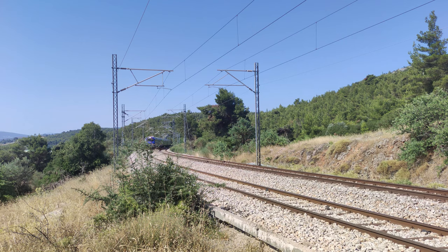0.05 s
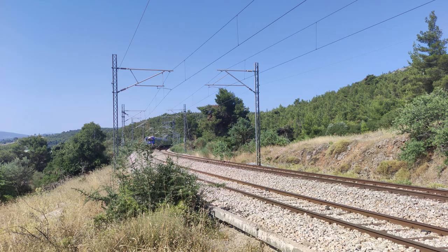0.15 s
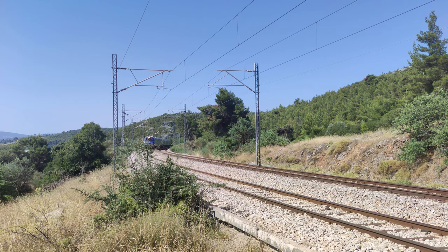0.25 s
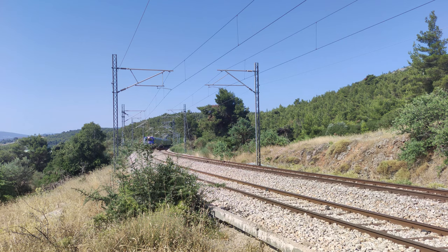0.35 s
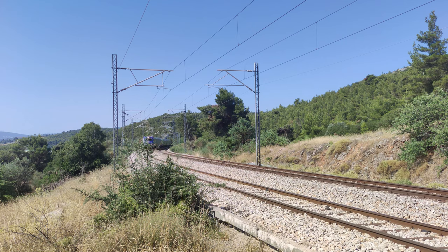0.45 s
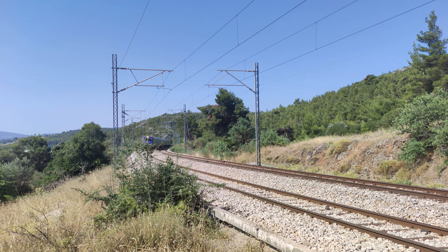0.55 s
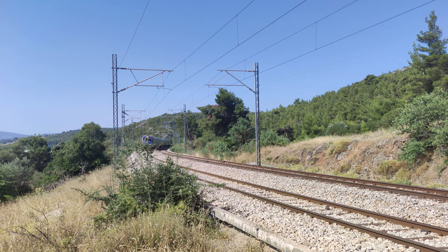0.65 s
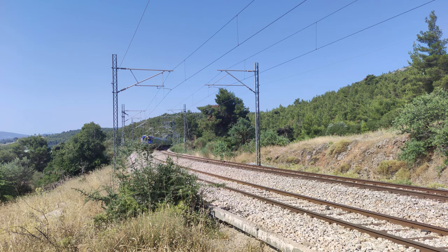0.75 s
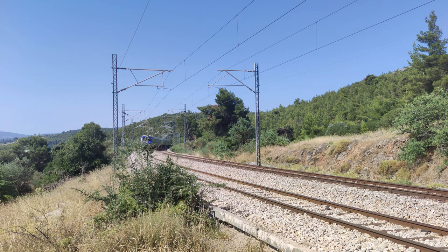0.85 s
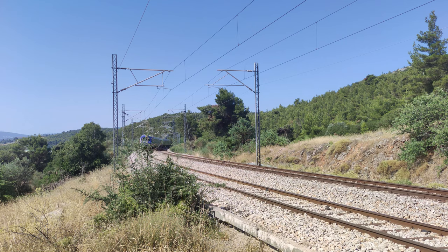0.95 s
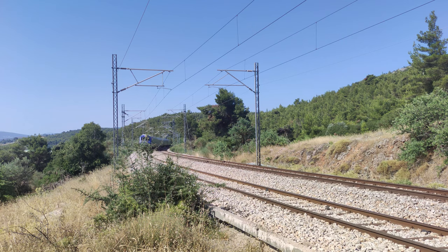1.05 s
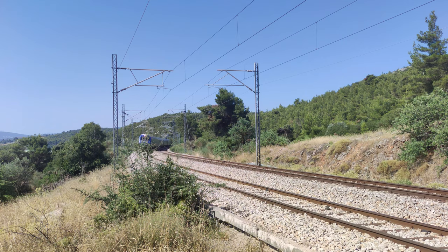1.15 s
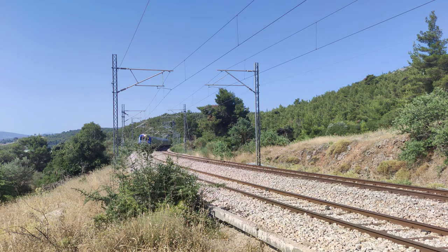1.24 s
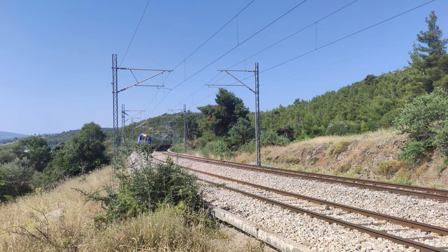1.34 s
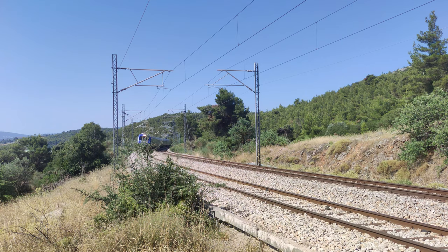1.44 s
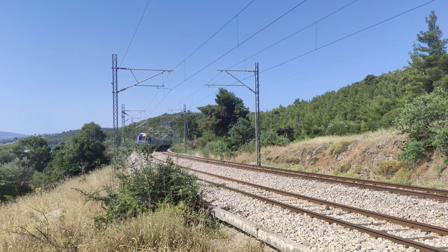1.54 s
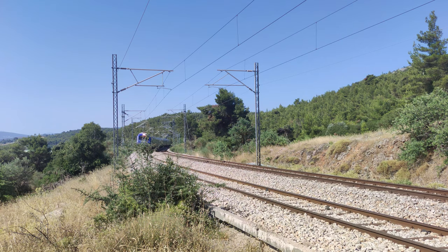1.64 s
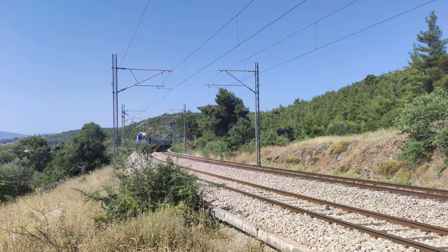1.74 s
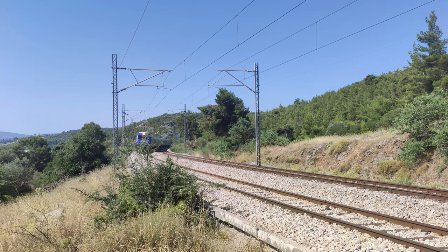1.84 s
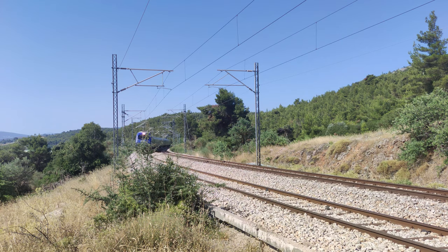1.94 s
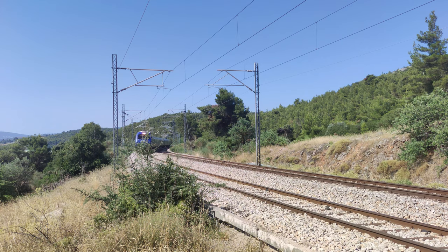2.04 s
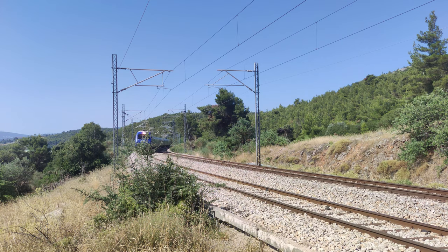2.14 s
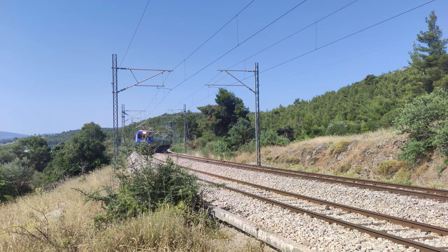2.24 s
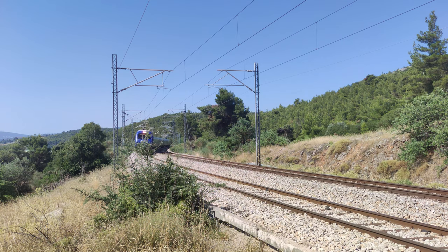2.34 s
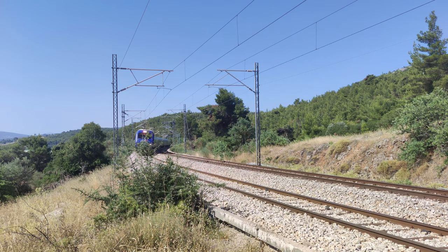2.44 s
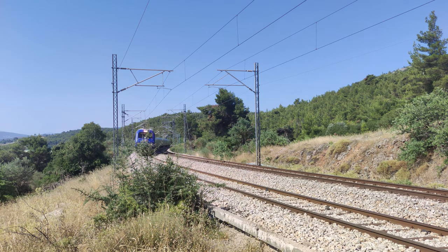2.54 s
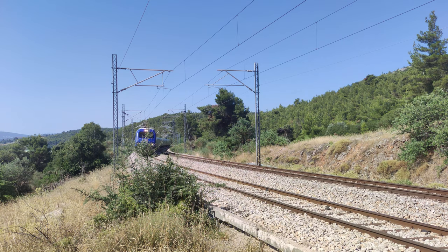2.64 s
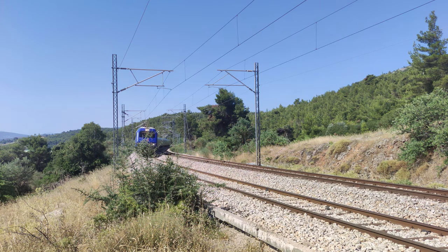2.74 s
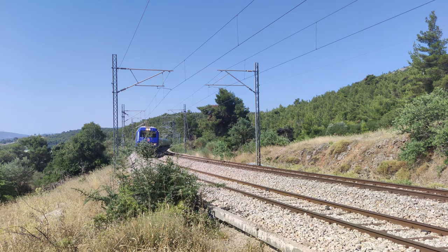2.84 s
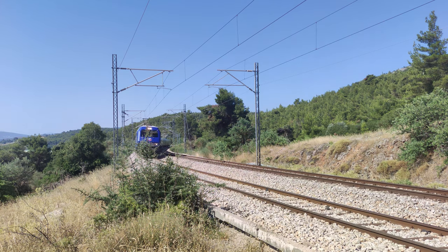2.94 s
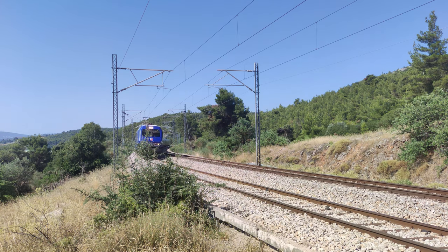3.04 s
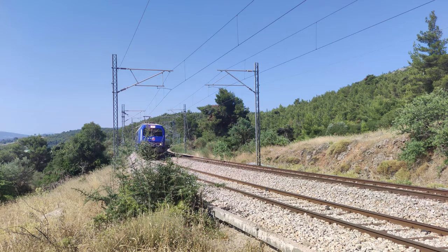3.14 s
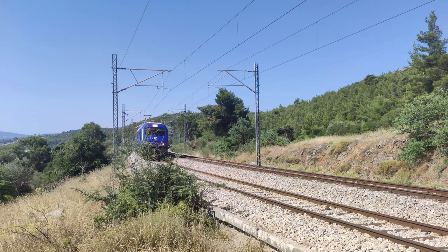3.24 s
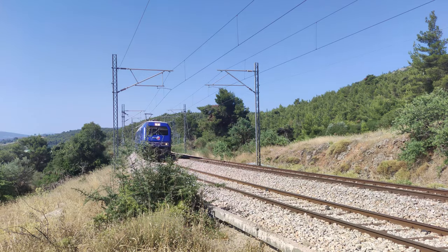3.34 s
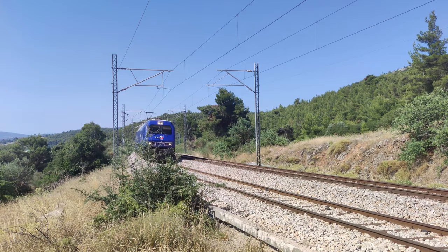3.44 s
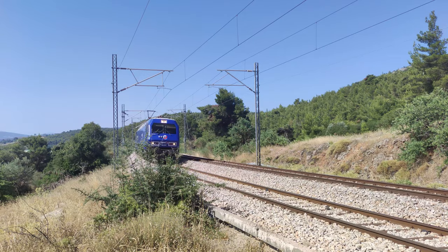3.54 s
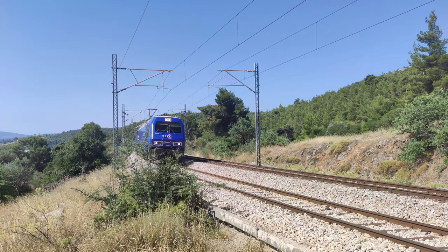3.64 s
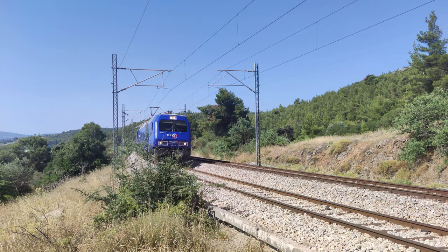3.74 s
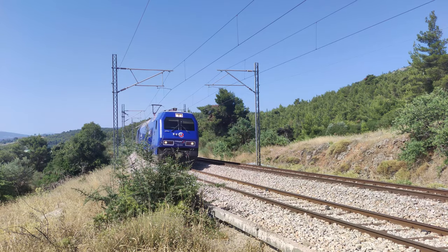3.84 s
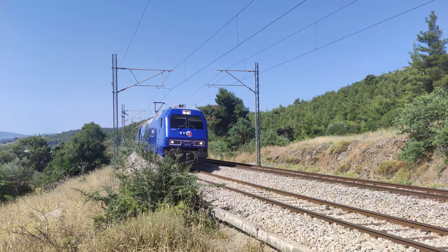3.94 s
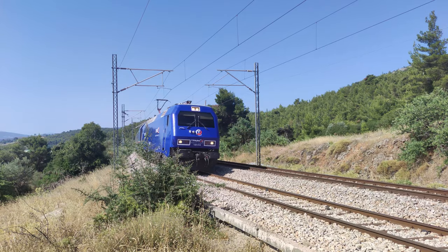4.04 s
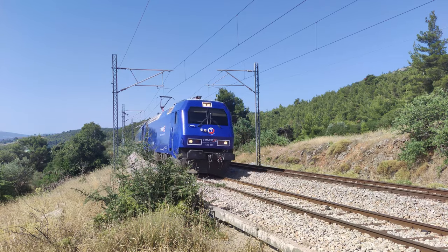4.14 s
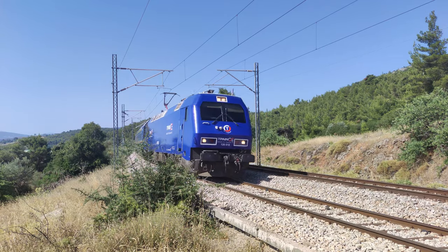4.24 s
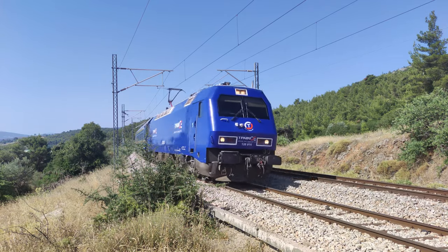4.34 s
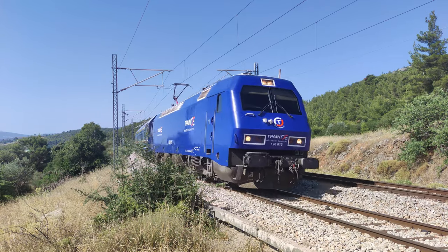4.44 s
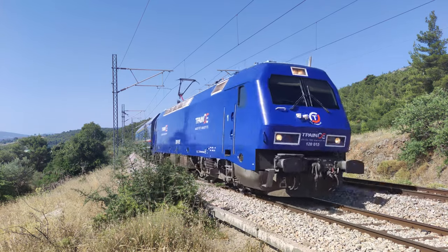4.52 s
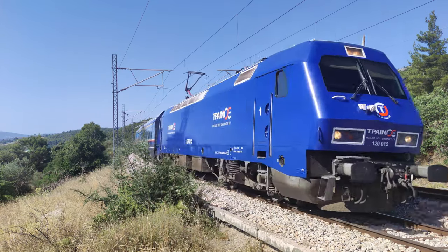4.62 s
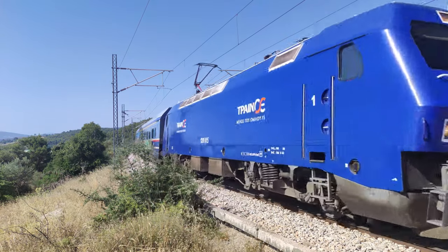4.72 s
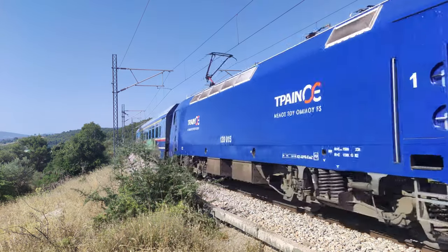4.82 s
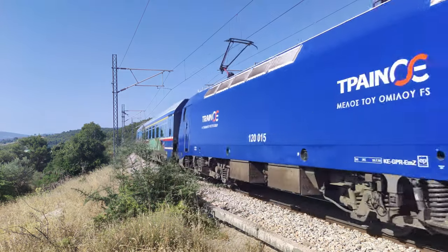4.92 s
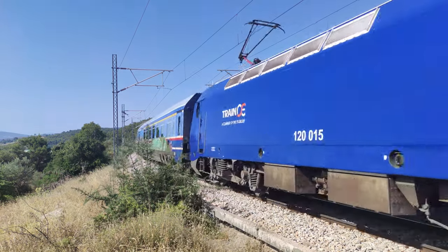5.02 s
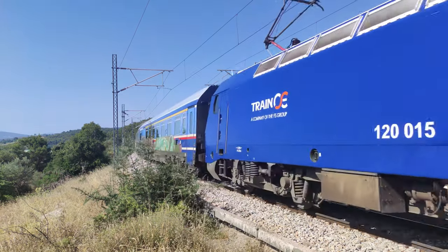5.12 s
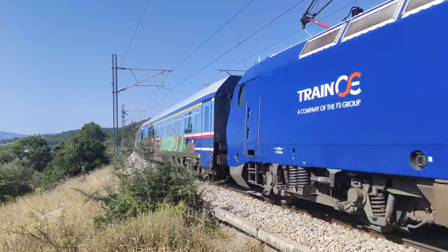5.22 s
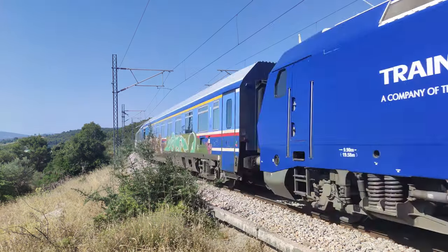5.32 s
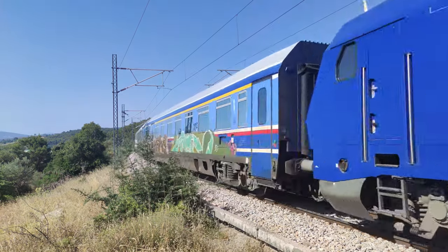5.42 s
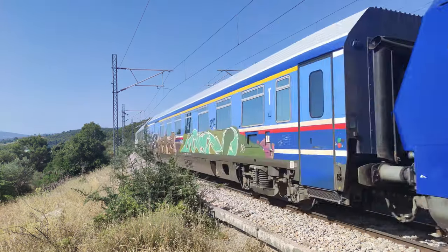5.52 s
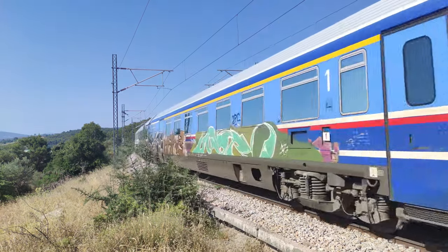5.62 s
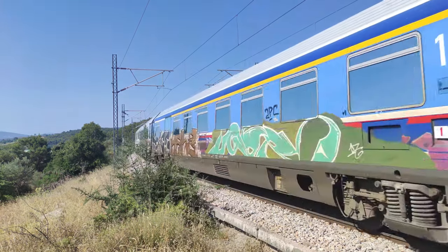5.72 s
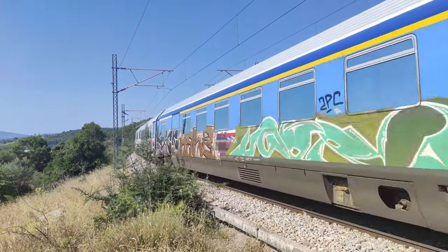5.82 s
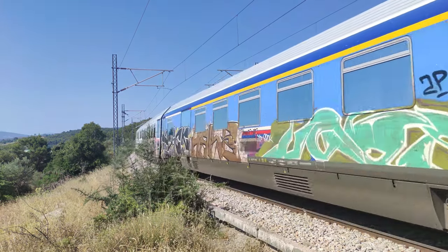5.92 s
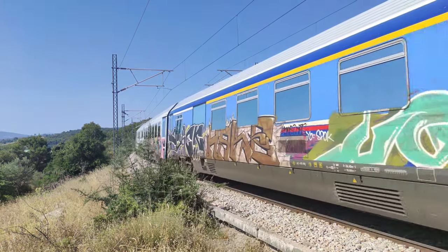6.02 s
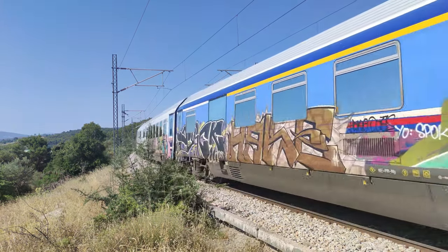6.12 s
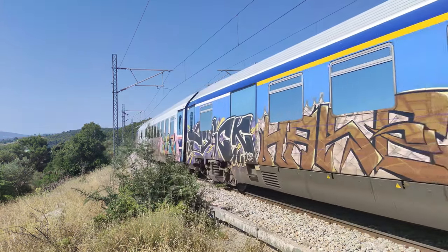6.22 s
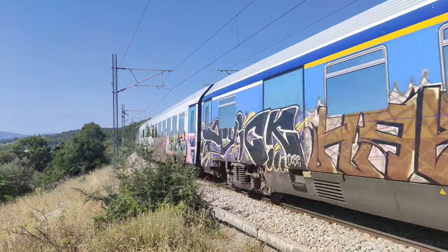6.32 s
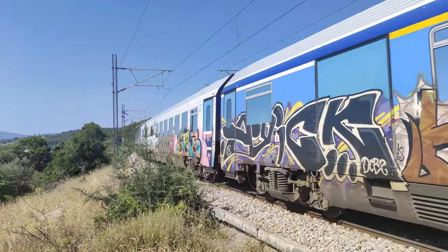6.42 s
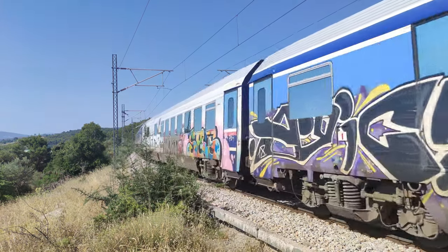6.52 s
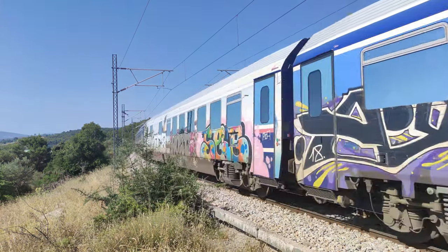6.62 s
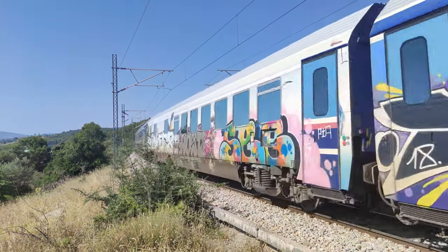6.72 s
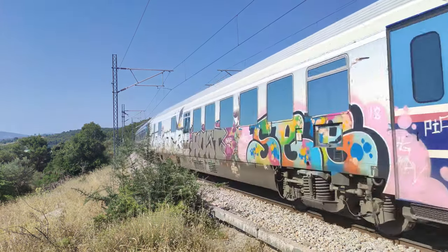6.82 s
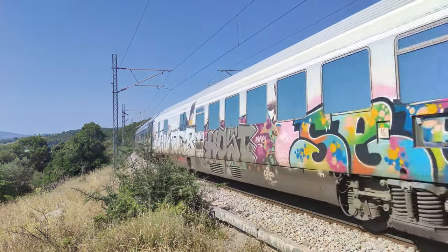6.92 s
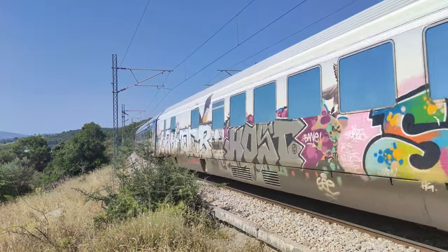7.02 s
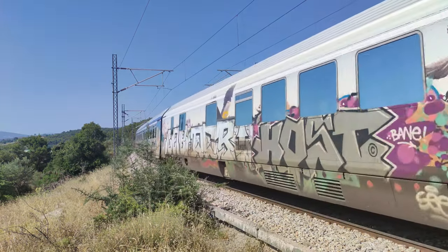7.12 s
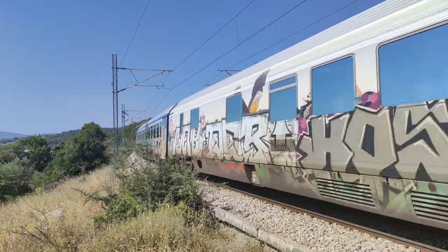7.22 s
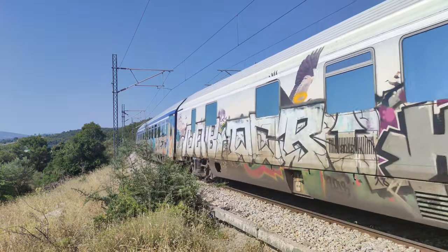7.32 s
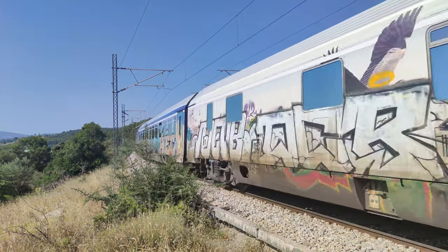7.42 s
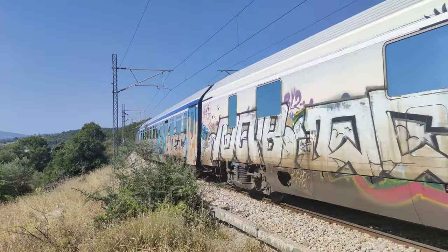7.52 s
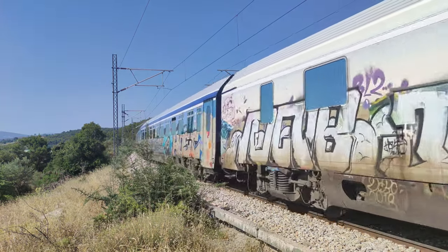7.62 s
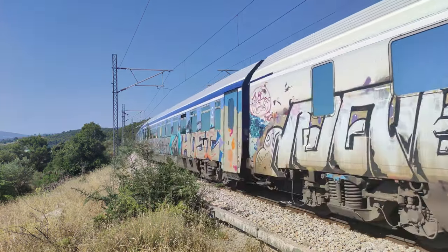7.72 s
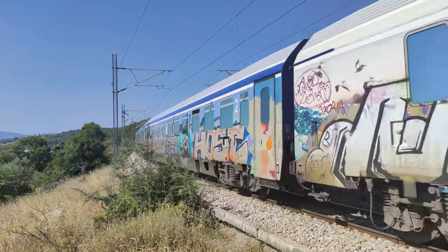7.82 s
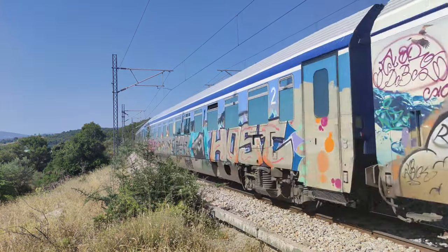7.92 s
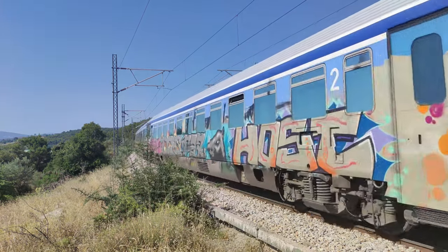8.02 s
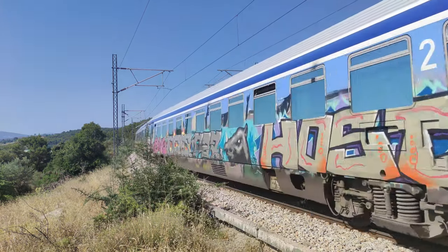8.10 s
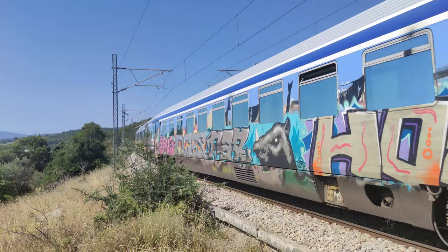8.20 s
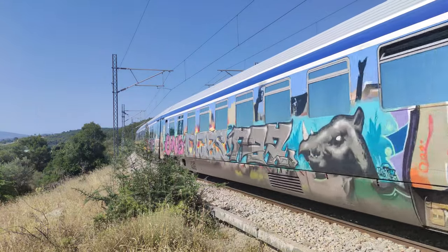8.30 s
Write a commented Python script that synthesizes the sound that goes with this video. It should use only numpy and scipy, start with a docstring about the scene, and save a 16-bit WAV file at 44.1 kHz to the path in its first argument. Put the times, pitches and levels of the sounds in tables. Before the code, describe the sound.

Outdoors beside a railway on a scrubby hillside, cicadas buzz over a faint low murmur. A distant train horn gives several short, uneven blasts that echo off the slopes. Gritty high wheel scrapes repeat about six times a second, growing closer. The electric locomotive then bursts past very near, rumbling and hissing, followed by coaches clattering over rail joints. Two spaced microphones give a wide stereo image, with slight wind buffeting.

```python
"""Cicadas (flickering noise) sing, a low murmur lies behind them, and a far train horn gives short blasts.
The horn adds up harmonics; slopes, a hillside and the far valley side send it back. A soft low bump falls between.
Then one wheel rubs the rail in gritty swells of noise, about once a turn, and wheels knock on the rail joints.
The electric locomotive and its coaches run past close by: shaped noise that swells with each group of wheels.
Wind gusts (low noise) are strongest near the end. Two spaced microphones, the two "ears", hear it all."""
import sys
import numpy as np
from scipy import signal
from scipy.fft import rfft, irfft
from scipy.io import wavfile
from scipy.ndimage import uniform_filter1d, map_coordinates

SR = 44100
rng = np.random.default_rng(int(sys.argv[2]) if len(sys.argv) > 2 else 0)


def inscribe(sig):
    """Save sig as 16-bit PCM at rate SR to the path in sys.argv[1].

    A 1-D sig is mono; a 2-D sig holds one channel per row.
    Samples are clipped to [-1, 1] before scaling.
    """
    pcm = np.round(np.clip(np.atleast_2d(sig).T, -1, 1) * 32767)
    wavfile.write(sys.argv[1], SR, pcm.astype(np.int16))


N = 368676  # length in samples


def amp(db):
    """Gain of a level in dB."""
    return 10 ** (np.asarray(db) / 20)


def evened(x):
    """The sound scaled to rms 1."""
    return x / np.sqrt(np.mean(x ** 2) + 1e-20)


def wander(shape, size, passes=1):
    """Slow random drift of rms 1: noise averaged over `size` steps, once or more."""
    x = rng.standard_normal(shape)
    for _ in range(passes):
        x = uniform_filter1d(x, size=size)
    return evened(x)


def read(points, hz):
    """Looks up a spectrum table, with pitch on a logarithmic scale."""
    f, value = np.transpose(points)
    return np.interp(np.log(hz + 1), np.log(f + 1), value)


def curve(rows, t, axis=1):
    """Looks up one column of a time table, in straight lines between its rows."""
    rows = np.array(rows)
    return np.interp(t, rows[:, 0], rows[:, axis])


def bells(rows, t):
    """Sum of smooth bumps in dB, each row giving a time, a width and a height."""
    return sum(db * np.exp(-((t - s) / width) ** 2) for s, width, db in rows)


def add(mix, s, sound):
    """Mixes a sound in at s seconds, cutting what runs past the end."""
    part = mix[..., round(s * SR):][..., :sound.shape[-1]]
    part += sound[..., :part.shape[-1]]


def lagged(x, lag_ms):
    """Sound from one side reaches one ear first: the left is late by lag_ms, which may change over time."""
    n, half = np.arange(x.shape[-1]), lag_ms * SR / 2000
    return np.array([map_coordinates(x, [n - half], order=3), map_coordinates(x, [n + half], order=3)])


# how alike the two ears hear noise: (f/Hz, likeness from 0 to 1)
LIKENESS = [(60, 0.96), (300, 0.92), (1000, 0.52), (2500, 0.12), (5000, 0.12), (7000, 0.65), (9500, 0.65),
            (15000, 0.7)]
# direction of the train; some sounds use only part of this lag: (t/s, left ear lag/ms)
TRAIN_LAG = [(0, 0.5), (3.0, 0.57), (3.8, 0.072), (4.3, 0.13), (4.8, -0.293), (5.1, -0.47), (8.4, -0.48)]


def noise(colour, size, patchy_db, flicker_db, lag=TRAIN_LAG, field=None):
    """Random short-time spectra in drifting patches, with a flicker shared by all pitches, in two ears."""
    hop = size // 4
    t, hz = np.arange(N // hop + 5) * hop / SR, np.fft.rfftfreq(size, 1 / SR)
    a, b, c, d, patches = rng.standard_normal((len(t), len(hz), 5)).astype(np.float32).T
    patches = uniform_filter1d(patches, size=max(size // 100, 2), axis=0)  # blurred over pitch
    patches = evened(uniform_filter1d(patches, size=2600 // hop + 1, axis=1))  # blurred over time
    flicker = wander(len(t), 700 // hop + 1)
    same = np.clip(read(LIKENESS, hz), 0, 1)[:, None]
    left = a + 1j * b
    right = same * left + np.sqrt(1 - same ** 2) * (c + 1j * d)
    lag_share = np.clip(0.35 + hz / 2000, 0, 1)  # the bass comes from many wheels along the line
    lag_share = lag_share * (hz < 6500)  # above 6500 Hz both ears hear it without lag
    late = np.exp(2j * np.pi * np.outer(hz * lag_share, curve(lag, t) / 1000))
    z = np.array([left, late * right])
    shape = amp(read(colour, hz)[:, None] + patchy_db * patches + flicker_db * flicker)
    z *= shape / np.sqrt(np.mean(shape ** 2))
    if field is not None:
        z *= field(t, hz)
    return signal.istft(z, nperseg=size, noverlap=size - hop)[1][:, :N] / np.sqrt(size * 4 / 3)


# level tilt between the two ears, varying with pitch: (f/Hz, left over right level/dB)
LEFT_OVER_RIGHT = [(100, -1.5), (1000, -1), (5000, 0.5), (7000, -2.5), (9000, 8.5), (11500, 3.5),
                   (15000, 1)]


def leaned(x):
    """Level tilt between the two ears, varying with pitch."""
    tilt = amp(read(LEFT_OVER_RIGHT, np.fft.rfftfreq(N, 1 / SR)) / 2)
    return irfft(rfft(x) * np.array([tilt, 1 / tilt]), N)


# colour of the body rumble: (f/Hz, relative level/dB per Hz)
RUMBLE = [(41, -39), (70, -19), (103, -16.5), (167, -3), (276, -2), (352, -1.5), (511, 0.5), (635, -6),
          (741, -6), (864, -2.5), (1060, -6.5), (1390, -11), (1500, -12.5), (1950, -22.5), (3300, -120)]
# colour of wheel on rail: (f/Hz, relative level/dB per Hz)
HISS = [(590, -7.5), (1000, -39), (1380, -21.5), (1660, -5.5), (2100, -7.5), (2370, -6), (2740, -7),
        (3480, -8), (3860, -6.5), (5620, -9.5), (7000, -11.5), (9100, -20.5), (15400, -120)]
# colour of the singing rail: (f/Hz, relative level/dB per Hz)
SING = [(3240, -39), (5500, -8.5), (6870, 3.5), (8140, 4.5), (8810, 6), (11100, -3), (15600, -15)]
# level of the rumble over time: it lifts at 4.38 s, then drops back: (t/s, level/dB)
RUMBLE_LEVEL = [(3.8, -3.5), (4.32, -5), (4.38, -1), (4.87, -6), (4.9, -5)]
# brief dips of the roar: (t/s, width/s, level/dB)
DIPS = [(5.214, 0.019, -5), (5.87, 0.023, -1), (6.21, 0.017, -4), (6.365, 0.013, -0.5)]


def rolling():
    """Rough wheels on rough rail: body rumble, mid hiss and the singing rail, with hums and a whine."""
    t = np.arange(N) / SR
    rumble = nearness(t, axis=1) * (noise(RUMBLE, size=1024, patchy_db=1.6, flicker_db=1.6) + hums(t))
    hiss = nearness(t, axis=2) * noise(HISS, size=512, patchy_db=1.53, flicker_db=1.25, field=surge)
    sing = nearness(t, axis=3) * noise(SING, size=256, patchy_db=1.8, flicker_db=1.2, field=sing_top)
    rumble = rumble * amp(curve(RUMBLE_LEVEL, t))
    return amp(bells(DIPS, t)) * (rumble + hiss + sing + whine(t))


# groups of wheels coming nearest; the first swell runs ahead through the rail:
# (t/s, rumble level/dB, hiss level/dB, singing level/dB)
WHEELS = [(3.721, -54, -28.5, -28), (4.47, -23.5, -58, -56), (4.65, -30, -23, -52), (4.88, -46, -49, -24),
          (5.15, -9.5, -16.5, -19), (5.45, -32, -31, -21.5), (5.82, -9.5, -14.5, -17.5),
          (6.55, -10.5, -16.5, -25.5), (6.87, -7.5, -12.5, -17), (7.65, -11, -19, -23.5),
          (8.1, -11, -14.5, -18), (8.45, -13.5, -13, -22)]
# fall of rumble, hiss and singing [dB per tenfold squared distance]
FALL_DB = (-13.5, -14.5, -13)
PASS_S = 0.26  # time to move as far as the track is away


def nearness(t, axis):
    """Gain of one layer: the powers of all wheel groups add up, each falling with its distance."""
    power = 0
    for row in WHEELS:
        distance = np.log10(1 + ((t - row[0]) / PASS_S) ** 2)
        power = power + amp(row[axis] + FALL_DB[axis - 1] * distance) ** 2
    return np.sqrt(power)


# swells of the hiss: (t/s, width/s, level/dB)
SURGES = [(5.13, 0.12, 5.5), (5.62, 0.063, 4), (6.3, 0.11, 3.5)]


def surge(t, hz):
    """The middle of the hiss, round 1700 Hz, swells as the driven bogies go by."""
    middle = np.exp(-(np.log2(hz / 1700 + .01) / .8) ** 2)
    return amp(np.outer(middle, bells(SURGES, t)))


# the locomotive is brighter than the coaches: (t/s, level/dB an octave above 9 kHz)
SING_TOP = [(4.4, 0), (4.6, 14), (5.2, 1), (6.1, -5), (8.4, -11)]


def sing_top(t, hz):
    """Gain of the highest treble of the singing rail, tilted above 9 kHz."""
    return amp(np.outer(np.log2(np.maximum(hz / 9000, 1)), curve(SING_TOP, t)))


# drive train and wheel tones: (f/Hz, width/Hz, level/dB against the rumble, start t/s, end t/s)
HUMS = [(178.4, 17, -11, 3.6, 6.3), (283, 18, -10.5, 5.1, 6.35), (429, 43, -10.5, 4.3, 5.88),
        (538, 50, -7.5, 4.33, 5.9), (2450, 90, -8.5, 3.26, 3.86), (173, 111, -7, 7.5, 8.6)]


def hums(t):
    """Noise in narrow resonances, each heard while its vehicle is near."""
    out = np.zeros(N)
    for (hz, width, db, start, end), drive in zip(HUMS, rng.standard_normal((len(HUMS), N))):
        tone = evened(signal.lfilter(*signal.iirpeak(hz, hz / width, SR), drive))
        out += amp(db) * tone * np.clip(np.minimum(t - start, end - t) / 0.12, 0, 1)
    return lagged(out, 0.73 * curve(TRAIN_LAG, t))


# wheels whine, mostly sinking in pitch as they go by: (t/s, f/Hz, level/dB)
WHINE = [(5.7, 2470, -45), (5.98, 2400, -28), (6.2, 2380, -40), (6.62, 2507, -37), (6.82, 2450, -33),
         (7.18, 2310, -29.5), (7.5, 2286, -34), (7.75, 2450, -40), (8.05, 2380, -29), (8.36, 2330, -54)]


def whine(t):
    """A narrow band of noise, about 100 Hz wide, follows a gliding pitch."""
    a, b = signal.lfilter(*signal.butter(1, 50, fs=SR), rng.standard_normal((2, N)))
    carrier = np.exp(2j * np.pi * np.cumsum(curve(WHINE, t)) / SR)
    tone = evened(((a + 1j * b) * carrier).real)
    return lagged(amp(curve(WHINE, t, axis=2)) * tone, curve(TRAIN_LAG, t))


# wheels on the rail joints: (t/s, peak level/dB before the ear tilt, chatter rate f/Hz, chatter length/s)
KNOCKS = [(2.967, -24, 445, 0.017), (3.694, -21, 335, .02), (3.702, -23.5, 894, 0.02),
          (4.359, -19, 431, 0.028), (4.409, -15, 970, 0.019), (4.424, -10, 431, 0.028),
          (4.496, -13, 482, 0.027), (4.546, -7, 485, 0.035), (4.706, -4, 213, 0.0078),
          (4.764, -13, 562, 0.01), (4.956, -8.5, 188, 0.019), (5.078, -5, 515, 0.028),
          (5.111, -6.5, 535, .04), (5.146, -1, 300, 0.032), (5.187, -0.5, 249, 0.0084),
          (5.299, -7, 511, 0.02), (5.551, -2.5, 157.5, 0.018), (5.608, -5, 473, 0.036),
          (5.656, -3.5, 547, 0.038), (5.718, -7, 272, 0.021), (5.765, -5.5, 329, .04),
          (6.019, -4, 321, 0.021), (6.126, -3, 237.5, 0.027), (6.237, -9, 516, 0.028),
          (6.403, -2, 251, 0.016), (6.407, -2.5, 842, 0.018), (6.514, -7, 590, 0.027),
          (6.738, -7, 514, 0.029), (6.811, -5.5, 280, 0.015), (6.878, -2.5, 703, .02),
          (6.988, 0, 242, 0.017), (7.137, -8, 238, 0.021), (7.213, 0.5, 140.8, 0.022),
          (7.317, -2, 400, 0.028), (7.431, -7.5, 158.2, 0.023), (7.602, -3, 360, 0.0063),
          (7.721, -14, 221, 0.017), (7.83, -8.5, 805, 0.017), (7.883, -6, 159, .008),
          (7.94, -4.5, 488, 0.021), (8.008, -2, 164, 0.038), (8.049, -5, 623, 0.019),
          (8.08, -3.5, 299, 0.017), (8.159, -7, 231, 0.0056), (8.192, -4, 389, 0.028),
          (8.311, -5.5, 230, 0.03)]
# ringing modes of the bogie, the wheel frame: (f/Hz, relative level/dB, time to die by 60 dB/s)
BOGIE = [(162, -1, 0.066), (239.5, -2, 0.19), (300, 2.5, 0.058), (391, 4, 0.058), (493.7, 5, 0.07),
         (634, 8.5, 0.048), (821, 6, 0.023), (970, 9, 0.011), (1360, 0, 0.016), (2390, -8, .03)]


def knocks():
    """A wheel chatters on the joint; the blows ring the bogie, most in the modes near their rate."""
    out, t = np.zeros(N), np.arange(6000) / SR
    for (s, db, rate_hz, length), luck in zip(KNOCKS, rng.standard_normal((len(KNOCKS), 2, 40))):
        ring = np.zeros(len(t))
        for hz, mode_db, t60 in BOGIE:
            near_db = -4.5 * abs(np.log2(hz / rate_hz))
            ring += amp(mode_db + near_db - 60 * t / t60) * np.sin(2 * np.pi * hz * t)
        when = abs(np.arange(40) + .5 + .2 * luck[0]) / rate_hz  # uneven timing
        strength = np.sin(np.pi * np.clip(when / length, 0, 1)) * amp(3 * luck[1])
        blows = np.zeros(SR // 2)
        blows[(when * SR).astype(int)] = strength
        hit = signal.fftconvolve(blows[:4000], ring)
        hit = signal.lfilter(*signal.butter(2, 110, "high", fs=SR), hit)
        add(out, s, amp(db) * hit / (abs(hit).max() + 1e-9))
    return lagged(out, 0.73 * curve(TRAIN_LAG, np.arange(N) / SR))


# colour of the rubbing: (f/Hz, relative level/dB per Hz)
RUB = [(2350, -35.5), (4000, -14), (6300, -10), (7600, 1.5), (8700, 6.5), (9900, -1.5), (11500, -1),
       (13400, -9.5), (14700, -6.5), (15600, -18)]


def rubs():
    """The rubbing wheel catches and slips, so each swell of noise is gritty."""
    grit = uniform_filter1d(rng.standard_normal(N), size=240)
    grit = evened(uniform_filter1d(grit, size=120))
    return amp(1.1 * grit) * noise(RUB, size=512, patchy_db=2.5, flicker_db=0.5, field=rub_field)


# the single rubs: (t/s, level/dB before tilt and wheel modes)
RUBS = [(2.069, -34.5), (2.2397, -27), (2.4094, -33), (2.5794, -24), (2.7394, -23), (2.9094, -22),
        (3.0779, -22), (3.2494, -22.5), (3.4166, -17.5), (3.577, -14.5), (3.7444, -13), (3.9194, -28),
        (4.4952, -16.5), (4.622, -11), (4.78, -6.5), (4.9194, -14), (5.272, -10.5), (5.4406, -9.5),
        (5.783, -12), (5.987, -15)]
# brighter from afar, down the rail: (t/s, level/dB an octave below 9 kHz per octave up, the same above it)
RUB_TILT = [(2.1, 17, 12), (3.0, 3, 2), (3.9, -8, 3), (4.5, -7.5, -11), (6, -11.5, -5)]
# the long rail ahead rings longer: (t/s, time to die by 60 dB/s)
RUB_T60 = [(3.9, 0.53), (4.5, 0.26)]


def rub_field(t, hz, rise=0.017, hold=0.043):
    """Each rub swells, then dies; its tilt turns about 9 kHz, and each wakes other wheel modes."""
    power = np.zeros((len(hz), len(t)))
    octaves = np.log2(hz / 9000 + 0.06)
    modes_db = 3 * wander((len(RUBS), len(hz)), 2)
    for (s, db), rings_db in zip(RUBS, modes_db):
        near = (t > s) & (t < s + .5)
        age = t[near] - s
        fade_db = -60 * np.maximum(age - hold, 0) / curve(RUB_T60, s)
        swell = np.minimum(0.59 + 0.41 * age / rise, 1) * amp(db + fade_db)
        slope_db = np.where(octaves < 0, curve(RUB_TILT, s), curve(RUB_TILT, s, axis=2))
        power[:, near] += np.outer(amp(rings_db + slope_db * octaves), swell) ** 2
    return np.sqrt(power)


# the flange, the wheel's rim, bites with a tick: (t/s, starting level/dB before the ear tilt)
TICKS = [(3.576, -23), (4.479, -14), (4.4958, -12.5), (4.599, -12.5), (4.6237, -12), (4.7657, -11),
         (4.919, -21), (4.968, -13), (5.221, -15)]
TICK_HZ, TICK_T60_S = 8900, .055  # pitch; time to die by 60 dB


def ticks():
    """Steel on steel: short bursts of noise round one pitch."""
    out, t = np.zeros((2, N)), np.arange(4000) / SR
    for (s, db), grit in zip(TICKS, rng.standard_normal((len(TICKS), 3, 4000))):
        both_ears = grit[0] + 1.4 * grit[1:]  # one shared part, one part for each ear
        ring = evened(signal.lfilter(*signal.iirpeak(TICK_HZ, 7.0, SR), both_ears))
        add(out, s, amp(db - 60 * t / TICK_T60_S) * ring)
    return out


# pulls on the horn valve: (t/s, length/s, level/dB when steady, time the pressure takes to build/s,
# steady f/Hz, second harmonic level/dB, level/dB of harmonics 3-8, which the ground echo partly cancels)
BLASTS = [(0.039, 0.2, -16, 0.0081, 739, -2, 1.5), (0.532, 0.043, -15, 0.015, 746, -0.5, -2),
          (0.585, 0.019, -17.5, 0.014, 757, 1, -1), (.615, 0.27, -12.5, 0.069, 739, 0.5, -0.5),
          (0.985, 0.04, -12, 0.004, 743.7, 1.5, -0.5), (1.317, 0.037, -13, 0.0014, 739.5, 0.5, -6.5),
          (1.365, 0.0074, -15.5, 0.0022, 737, 3.5, -0.5)]
# echoes off the slopes: (delay t/s, level/dB before patchiness, left ear lag/ms)
SLOPES = [(.035, -16, .2), (.1, -20, -.3), (.25, -26, .45)]
FAR_ECHO_S, FAR_ECHO_DB = 1.45, -27  # a dull echo from across the valley


def horn():
    """The blasts, their echoes off the slopes and the valley side, and the long tail."""
    dry = np.zeros((2, 2 * SR))
    for row in BLASTS:
        add(dry, row[0], blast(*row[1:]))
    out = np.zeros((2, N))
    add(out, 0, np.array([lagged(dry[0], 0.1)[0], lagged(dry[1], 0.12)[1]]))
    dull = signal.lfilter([.8], [1, -.2], dry.mean(0))  # grass and air take the treble from echoes
    for s, db, lag_ms in SLOPES:
        add(out, s, amp(db + echo_patches_db()) * lagged(dull, lag_ms))
    add(out, 0, amp(-18.5) * hillside(dull))
    far = signal.lfilter(*signal.butter(2, 900, fs=SR), dull)
    add(out, FAR_ECHO_S, amp(FAR_ECHO_DB + echo_patches_db()) * lagged(far, 0.4))
    return out


# recipe of the horn's tone: (harmonic number, relative level/dB)
HARMONICS = [(1, -5), (2, -8.5), (3, -10), (4, -12), (5, -11), (6, -10), (7, -13.5), (8, -12.5), (9, -13),
             (10, -14), (11, -14), (12, -12.5), (13, -20), (14, -22), (15, -21.5), (16, -32)]
OPENING_DB, SURGE_DB, SURGE_S = -8, 2, 0.0053  # level as the valve opens; swell just before it shuts
RELEASE_S = 0.0102  # time to die by 10 dB once shut
SCOOP_HZ, SCOOP_S = 18, .006  # starts flat and settles
SPUTTER_DB = 4.5  # unsteady loudness while the pressure builds


def blast(length, level_db, build, steady_hz, second_db, middle_db):
    """A diaphragm chops the air, raggedly at unsettled pressure; warm air makes harmonics waver."""
    t = np.arange(0, length + 3 * RELEASE_S, 1 / SR)
    filling, shut = np.exp(-t / build), np.maximum(t - length, 0) / RELEASE_S
    closing = np.exp(np.minimum(t - length, 0) / SURGE_S)
    slack_db = OPENING_DB * filling + SURGE_DB * closing - 10 * shut
    ragged = np.clip(filling + np.exp(-t / 0.059) + 0.5 * closing ** 2, .05, 1)

    sharp_hz = 24 * (0.29 * closing ** 2 + 1.27 * np.minimum(2 * shut, 1))  # goes sharp as the valve shuts
    hz = steady_hz - SCOOP_HZ * np.exp(-t / SCOOP_S) + sharp_hz
    wobble = .005 * ragged * wander(len(t), 200)
    drift = .0015 * np.interp(t, np.arange(30) / 30, rng.standard_normal(30))
    turns = np.cumsum(hz * (1 + wobble + drift)) / SR

    out = np.zeros((2, len(t)))
    for k, db in HARMONICS:
        knots = rng.standard_normal((2, 30))
        knot_times = np.arange(30) / (16 + 2 * min(k, 8))
        waver = np.array([np.interp(t, knot_times, row) for row in knots])
        blur = ragged * min(.07 * k, .55) * wander((2, len(t)), 130, passes=2)
        dulling_db = min(k - 1, 6) * (0.016 * slack_db - shut)  # low pressure dulls the tone
        harmonic_db = db + second_db * (k == 2) + middle_db * (2 < k < 9) + dulling_db
        phase = 2 * np.pi * k * turns + 1.5 * k + min(.25 * k, 1.3) * waver[::-1] + blur
        out -= amp(harmonic_db + min(.5 + .6 * k, 3) * waver) * np.cos(phase)

    air = signal.lfilter([.5, -.5], [1, -.6], rng.standard_normal(len(t)))
    air *= 1 + np.cos(2 * np.pi * turns)  # the hiss of air pulses with the diaphragm
    tone = evened(out) + amp(-22) * ragged * air
    sputter_db = SPUTTER_DB * filling * wander(len(t), 350, passes=2)
    soft_ends = signal.windows.tukey(len(t), .008 * SR / len(t))
    return amp(level_db + slack_db + sputter_db) * tone * soft_ends


def echo_patches_db(depth_db=3):
    """Scrub and moving air break an echo up, differently for each ear."""
    return depth_db * wander((2, 2 * SR), 600, passes=2)


# how long the hillside rings: (f/Hz, time to die by 60 dB/s)
HILL = [(740, 4.2), (1500, 1.4), (2300, 1.7), (3200, .9), (5000, .7), (10000, .3)]


def hillside(x):
    """Many small reflections: sparse taps of random sign, each band dying at its own speed."""
    taps = np.zeros((2, 2 * SR))
    at = np.arange(900, 2 * SR - 20, 20)
    places = at + rng.integers(0, 20, (2, len(at)))
    np.put_along_axis(taps, places, rng.choice([-1., 1.], (2, len(at))), 1)
    taps[0] += 3.9 * np.roll(taps[1], 20)  # much of it comes from the slope on the right
    hz, t, z = signal.stft(taps, SR, nperseg=256)
    tail = signal.istft(z * amp(-60 * t / read(HILL, hz)[:, None]), SR, nperseg=256)[1]
    tail = tail / np.linalg.norm(tail, axis=1)[:, None]
    return signal.fftconvolve(x[None], tail, axes=1)[:, :N]


# a low bump near the microphones: (start t/s, length/s, level/dB, f/Hz at its ends, f/Hz added at its middle)
BUMP = (.919, .042, -28, 140, 70)


def bump():
    """One soft low burst that rises and falls in pitch, the same in both ears."""
    s, length, db, hz, arch_hz = BUMP
    out = np.zeros(N)
    arch = np.sin(np.pi * np.arange(0, length, 1 / SR) / length)
    turns = np.cumsum(hz + arch_hz * arch) / SR
    add(out, s, amp(db) * np.sqrt(arch) * np.sin(2 * np.pi * turns))
    return out


# no lag between the ears: (t/s, left ear lag/ms)
AHEAD = [(0, 0), (9, 0)]
# colour of the cicada chorus: (f/Hz, relative level/dB per Hz)
CICADAS = [(1760, -70), (3000, -40), (3590, -23), (4860, -7), (5360, -12), (6450, -16), (7610, -11),
           (8100, -5), (8680, -1), (9760, -2), (13500, -13), (14700, -57), (15600, -23)]


def cicadas():
    """High noise trembling 107 times a second; it fades by 13 dB as the train arrives."""
    t = np.arange(N) / SR
    chorus = amp(-26.5) * noise(CICADAS, size=256, patchy_db=1.2, flicker_db=1.2, lag=AHEAD)
    return chorus * amp(np.sin(2 * np.pi * 107 * t) - 13.0 * np.clip(t - 3.9, 0, 1))


# colour of the far murmur of the line: (f/Hz, relative level/dB per Hz)
VALLEY = [(59, -44), (100, 1), (290, -11), (323, -16), (440, -4), (498, -16), (590, -1), (4000, -19.5),
          (5200, -30), (8800, -120)]


def murmur():
    """Steady soft noise, mostly low, for the far murmur of the line."""
    return amp(-34) * noise(VALLEY, size=1024, patchy_db=1.2, flicker_db=.6)


# colour of wind at the microphones: (f/Hz, relative level/dB per Hz)
WIND = [(20, -16), (35, 0), (62, -0.5), (80, -0.5), (100, -14), (170, -39)]
# strength of the wind: (t/s, level/dB)
GUSTS = [(0.0, -37), (3.28, -35.5), (5.26, -27.5), (5.47, -43), (5.78, -30), (5.9, -32.5), (7.66, -26.5),
         (7.85, -21), (8.36, -31)]


def wind():
    """Wind at the microphones: deep noise that comes and goes in gusts."""
    gusts = amp(curve(GUSTS, np.arange(N) / SR))
    return gusts * noise(WIND, size=4096, patchy_db=-1.5, flicker_db=-0.5, lag=AHEAD)


def scene():
    """Train, horn and surroundings at the two microphones."""
    train = leaned(rolling() + knocks() + rubs() + ticks())
    return train + horn() + bump() + cicadas() + murmur() + wind()


def record(dry):
    """A soft ceiling rounds the loudest peaks, then a filter removes what lies above 15750 Hz."""
    held = dry / (1 + dry ** 4) ** (1 / 4)
    band_limit = signal.firwin(1535, 15750, window=("kaiser", 9), fs=SR)
    return signal.oaconvolve(held, band_limit[None], "same")


dry = scene()
out = record(dry)
inscribe(out)
```